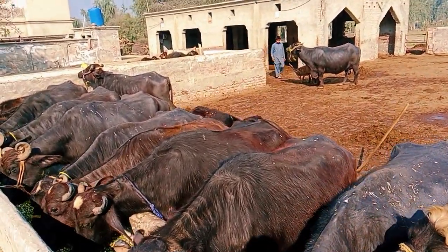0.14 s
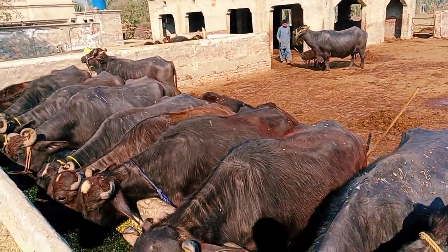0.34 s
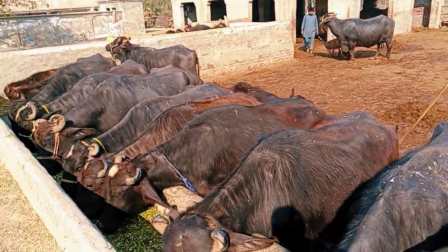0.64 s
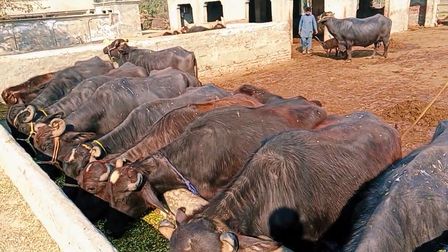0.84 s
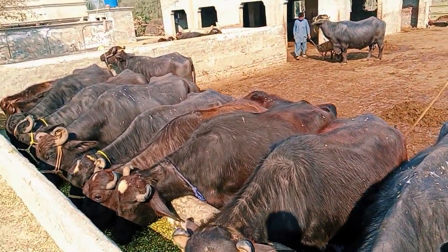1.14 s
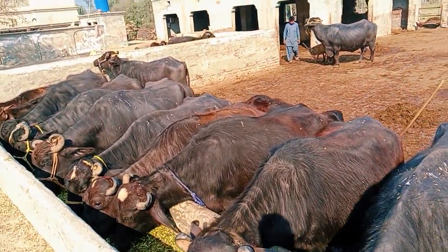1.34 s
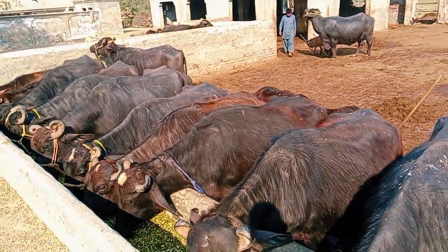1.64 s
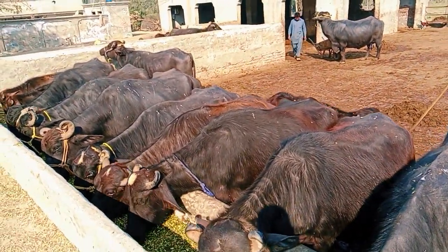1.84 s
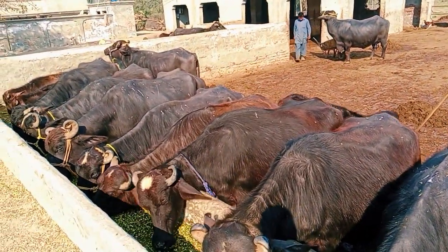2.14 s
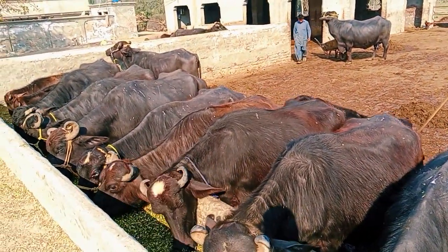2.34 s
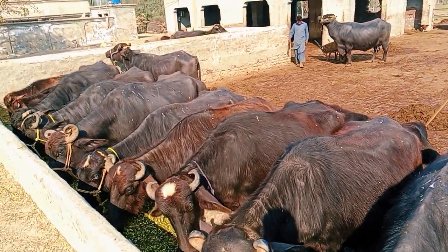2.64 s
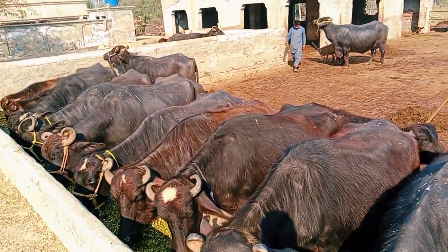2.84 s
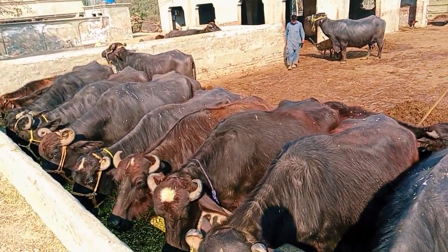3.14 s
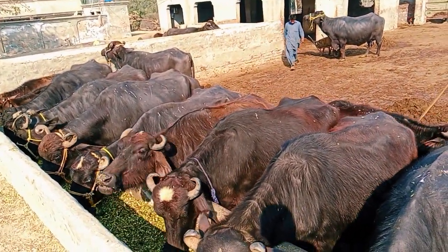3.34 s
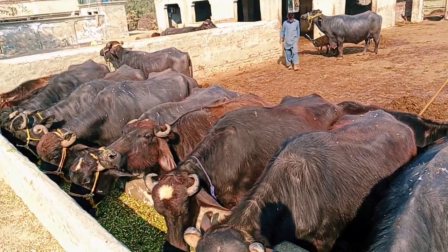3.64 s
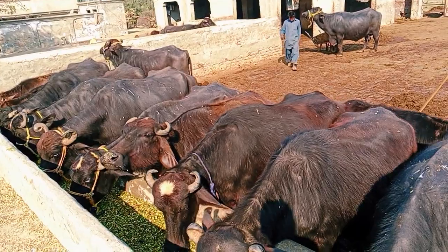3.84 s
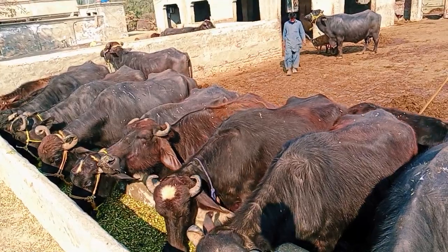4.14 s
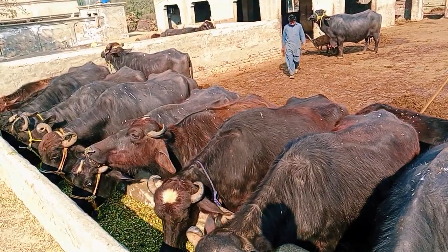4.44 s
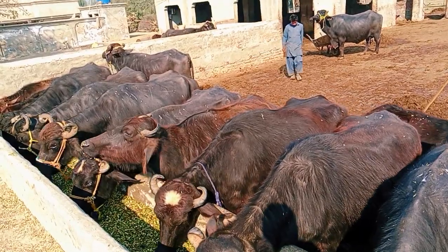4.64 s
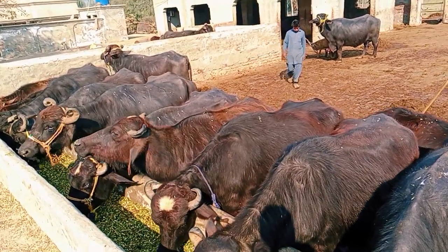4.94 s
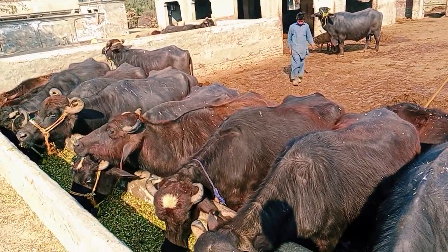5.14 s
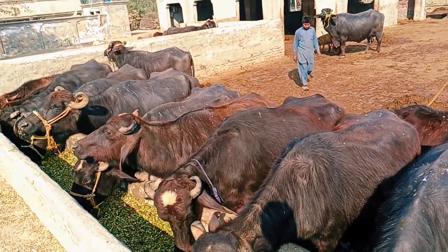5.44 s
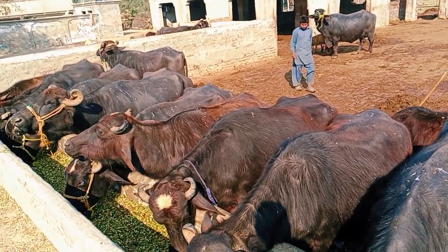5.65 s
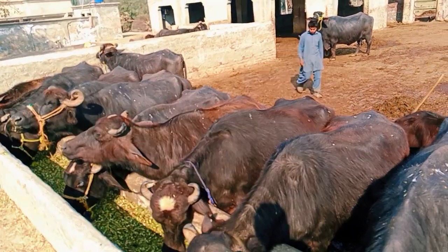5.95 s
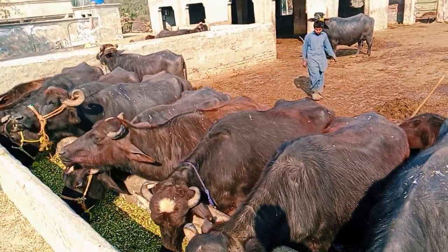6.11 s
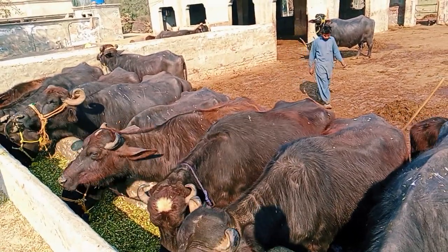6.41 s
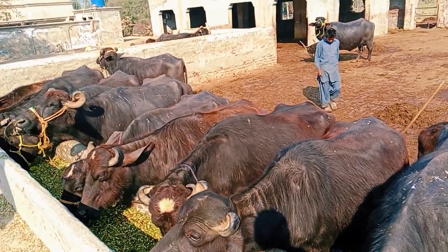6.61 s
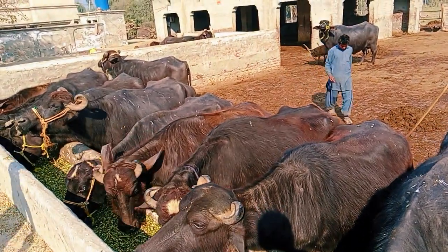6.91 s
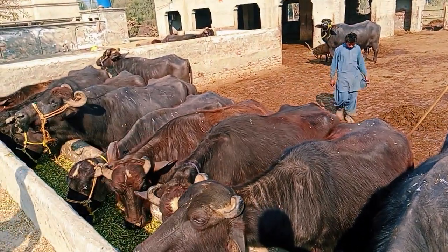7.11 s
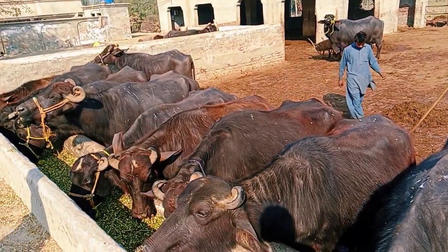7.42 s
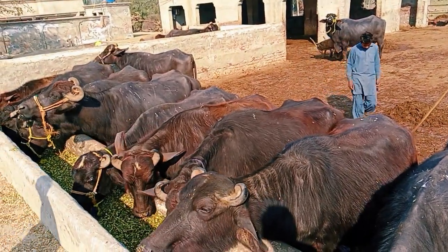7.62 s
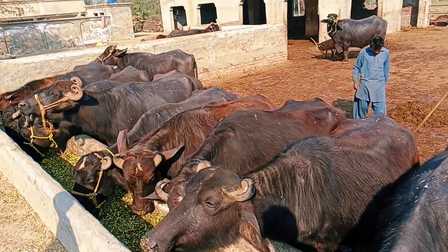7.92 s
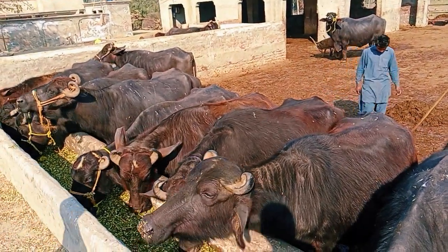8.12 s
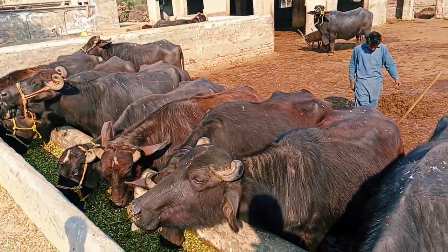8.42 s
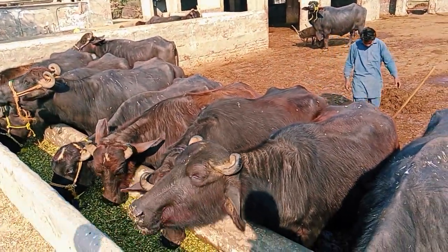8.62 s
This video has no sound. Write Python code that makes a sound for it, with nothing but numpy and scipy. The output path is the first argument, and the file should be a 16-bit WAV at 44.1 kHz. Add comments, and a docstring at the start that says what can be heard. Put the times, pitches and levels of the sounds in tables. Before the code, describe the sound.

From about 0.1 to 1.2 seconds a water buffalo lows close by, deep and nasal, rising slightly, opening wide, then dropping into a rough creak. Light wind, faint herd shuffling and a distant bird flock lie underneath. Quick twitters arrive at 1.1, and hollow trough knocks stand out near 1.0, 1.7 and 2.2. From 2 to 4.5 mynas give gliding whistles, chips and raspy scolds, with lower single pips. Between 4.6 and 5.3 birds burst into a dense, loud, harsh flurry. Around 5.4 to 5.7 a puff of wind bumps the microphone with dull low thuds. Sparser arched whistles and knocks follow; at 7.1 come chirps and crackly chatter, then a faint low dove-like coo near 7.35. From 8.2 to 8.6 stalks snap sharply amid rustling, a shifting body and high chirps, with final bright whistles at 8.7. Yard walls echo briefly.

```python
"""Buffalo at the trough

In a walled yard a water buffalo lows once: vocal-fold pulses ring its opening and closing mouth, then creak.
Mynas whistle, chip and rasp in gliding tones, near and far; a lower bird pips, one coos low like a dove,
and bursts of tiny ringing grains make a harsh, crackly chatter.
The herd knocks, scuffs and rustles in the fodder as bursts and noise that ring trough and stalks.
A puff of wind swells as low noise and bumps the microphone; the walls answer with decaying echoes."""
import sys
import numpy as np
from scipy import signal
from scipy.fft import rfft, irfft, next_fast_len
from scipy.io import wavfile
from scipy.ndimage import uniform_filter1d, map_coordinates

SR = 44100
rng = np.random.default_rng(int(sys.argv[2]) if len(sys.argv) > 2 else 0)


def unload_audio(sound):
    """Save the sound as a 16-bit wav file, at the path given as the first command line argument."""
    columns = np.transpose(np.atleast_2d(sound))
    # keep every value between -1 and 1, then stretch to whole-number steps
    steps = np.round(np.clip(columns, -1, 1) * 32767)
    wavfile.write(sys.argv[1], SR, steps.astype(np.int16))


N = 386757

# echo decay of the near yard walls: pitch_hz, t60_s
WALL_DECAY = [(100, 0.57), (700, 0.12), (2500, 0.21), (6000, 0.23), (12000, 0.19)]
# relative noise spectra of wind, herd, far birds, fodder and still air: pitch_hz, level_db (per Hz)
WIND_SPECTRUM = [(20, -31), (45, -5.5), (75, 4.5), (130, -4), (220, -11), (500, -69)]
HERD_SPECTRUM = [(120, -22.5), (250, 4), (500, -4), (800, -2.5), (1200, -2), (2200, -6), (5000, -33)]
FLOCK_SPECTRUM = [(900, -20), (1400, -5.5), (2000, -2), (3000, 1), (4500, -3), (6400, -13), (7500, -23),
                  (9000, -45)]
FODDER_SPECTRUM = [(2350, -54.5), (4000, -37), (4940, -10.5), (5380, 6.5), (6870, 7.5), (8800, -13),
                   (10500, -7.5), (12300, -11.5), (15600, -12)]
AIR_SPECTRUM = [(180, -26), (300, 4), (452, -3), (775, 3), (975, -7), (3120, -6.5), (3440, -19.5),
                (5440, -15), (8320, -29.5), (15000, -37.5)]
# level of the far flock, before a common trim: time_s, level_db
FLOCK_LEVEL = [(0, -48.5), (1.15, -53.5), (1.35, -51), (1.65, -52), (1.82, -45.5), (2.24, -60),
               (3.09, -62.5), (3.25, -58.5), (3.88, -54), (4.03, -62.5), (4.62, -67.5), (4.79, -47.5),
               (5.32, -55.5), (5.48, -61), (6.4, -54.5), (6.75, -70), (6.94, -54), (7.06, -47.5),
               (7.14, -48.5), (7.48, -66.5), (8.05, -59), (8.5, -55.5), (8.77, -103)]
# animals shifting their weight: start_s, fade_s (to fall 17 dB), level_db
SHIFTS = [(1.56, 0.14, -66), (3.11, 0.028, -54), (5.51, 0.057, -54.5), (7.07, 0.072, -70),
          (8.39, 0.047, -41)]
# mouthfuls of fodder pulled: start_s, fade_s (to fall 17 dB), level_db
RUSTLES = [(2.94, 0.11, -51.5), (3.56, 0.17, -57), (3.9, 0.061, -64.5), (4.1, 0.25, -72),
           (4.7, 0.049, -61.5), (5.21, 0.011, -62), (8.385, 0.19, -50.5), (8.54, 0.24, -58),
           (8.73, 0.15, -52.5)]
STROKE_ATTACK_S = 0.022
# the puff of wind builds, then drops away
GUST_S, GUST_DB, GUST_BUILD_DB_PER_S, GUST_DROP_DB_PER_S = 5.64, -42.5, 46.5, 303

# harsh scolding notes, before the direct and echo shares: start_s, length_s, pitch_hz, level_db
SCOLDS = [(0.013, 0.24, 1290, -41), (.457, 0.041, 5320, -44), (0.598, 0.038, 6440, -44),
          (.73, .11, 5850, -45.5), (1.704, 0.18, 4680, -42.5), (2.168, 0.056, 5260, -52.5),
          (2.483, 0.072, 2610, -38.5), (3.018, 0.26, 1996, -38), (5.93, 0.09, 4100, -47.5),
          (5.93, 0.031, 1667, -46), (5.99, 0.076, 5900, -55.5), (7.087, 0.047, 1834, -48),
          (7.064, 0.089, 4320, -47.5), (7.076, 0.17, 2920, -49), (7.195, 0.049, 5700, -51),
          (7.99, 0.073, 5200, -56.5), (8.245, 0.069, 3420, -44)]
SCOLD_FALL, SCOLD_RASP_PER_HZ = 0.0306, 0.000275  # swing either side of the pitch; higher notes are harsher

# the low, ending in a creak of slack folds: time_s, pitch_hz
LOW_PITCH = [(.079, 78), (0.15, 82.0), (0.238, 88.0), (0.364, 93.9), (0.478, 95.3), (0.778, 91.2),
             (0.946, 85.5), (1.006, 80.7), (1.044, 76.8), (1.1, 67.9), (1.14, 55), (1.2, 42), (1.28, 40)]
# time_s, mouth_shape (0 opening, 1 wide, 2 closing), tongue_tuning (ratio, upper resonances),
# treble_tuning (ratio), treble_db
MOUTH = [(.15, .38, 1.05, 1.19, -7.5), (.27, .5, 0.97, 1.06, -7.5), (.42, .82, 0.99, 1.03, -6),
         (.55, .9, 1.02, 1.07, -1), (.7, 1.25, 0.97, 0.994, -1.5), (.82, 1.55, 1.034, 1.02, -1.5),
         (.97, 1.65, 1.02, 1.03, -9), (1.12, 1.8, .99, 1.065, 0)]
# throat resonances for each mouth shape: pitch_hz, half_width_hz, level_db
OPENING_THROAT = [(448, 66, 0), (686, 27, 5.5), (980, 150, 5), (1265, 28, 12), (1563, 31, 3.5),
                  (1900, 160, -1), (2280, 62, 7.5), (2570, 120, 3), (3090, 56, 4.5), (3550, 58, 3),
                  (4400, 240, -27)]
WIDE_THROAT = [(285, 100, -13.5), (667, 29, 3.5), (821, 72, 5.5), (940, 42, -1), (1275, 50, 1),
               (1490, 85, -9), (2070, 43, -8), (2375, 123, -9), (2816, 48, -11), (3200, 96, -9.5),
               (3700, 87, -12.5), (4036, 37, -11), (4250, 550, -29.5)]
CLOSING_THROAT = [(467, 51, -3), (699, 44, 0.5), (972, 32, 3), (1305, 64, -4.5), (1590, 67, -6),
                  (1837, 42, -11.5), (2160, 95, -5.5), (2424, 47, -8), (2950, 180, -30), (3330, 59, -9.5),
                  (4200, 130, -43)]
# treble resonances shared by all mouth shapes: pitch_hz, half_width_hz, level_db
TREBLE_THROAT = [(5080, 230, -26), (5610, 180, -19), (6320, 124, -23.5), (7310, 140, -33),
                 (10200, 580, -56)]
STEADY_HZ, CREAK_HZ = 84.3, 54.8  # the folds slacken between these pitches
# effort of the low: it swells, sags slowly, then lets go
ATTACK_S, ATTACK_DB = 0.029, 40
CREST_S, CREST_DB, SAG_DB_PER_S = 0.49, -29.5, 6.5
RELEASE_S, RELEASE_DB_PER_S = 1.145, 170
# the nose hums unless the mouth is wide, grows as the breath runs on, and dies more slowly
HUM_DB, HUM_GROWS_DB_PER_S = -40.5, 9
HUM_RELEASE_S, HUM_RELEASE_DB_PER_S = 1.04, 78
HUM_CUT_DB, HUM_CUT_WIDTH = 11.5, 0.39  # loss with the mouth wide; range of mouth shapes that counts as wide

# rising chirps: start_s, pitch_hz, level_db
CHIRPS = [(.26, 4520, -41), (2.016, 2670, -49.5), (3.5, 1967, -46.5), (7.062, 1624, -37.5),
          (8.304, 4050, -46), (8.38, 5630, -42), (8.425, 3960, -46.5), (8.439, 4920, -45.5)]
CHIRP_S, CHIRP_RISE, CHIRP_RASP = 0.047, 0.12, 0.24  # length, swing either side of the pitch, rasp
# slurs and held whistles, one a low dove-like coo; most fall and level out, some stay level or rise:
# start_s, length_s, start_hz, end_hz, level_db, rasp (0-1)
SLURS = [(0.93, 0.056, 3420, 2270, -35.5, 0.1), (1.641, 0.09, 2830, 2782, -40.5, 0.08),
         (2.074, 0.029, 3310, 3390, -49.5, 0.17), (2.095, 0.072, 3155, 2530, -41, 0.1),
         (2.257, 0.064, 4640, 4560, -54.5, 0.2), (2.37, 0.031, 3460, 3390, -35.5, 0.1),
         (2.395, 0.023, 3100, 2690, -38, 0.25), (2.416, 0.1, 2860, 2056, -44.5, .14),
         (2.668, 0.12, 2150, 1966, -49.5, 0.05), (2.679, 0.13, 4210, 3880, -50.5, 0),
         (3.311, 0.03, 3250, 3306, -40, 0), (3.337, 0.094, 2995, 2720, -44, 0.24),
         (3.538, 0.026, 3270, 3220, -39.5, 0.14), (3.372, 0.097, 2325, 2220, -48.5, 0.16),
         (3.812, 0.071, 2690, 1754, -40.5, 0.07), (4.281, 0.09, 2200, 2050, -43.5, 0.1),
         (4.37, 0.12, 2095, 2100, -53, 0.03), (4.223, 0.047, 3280, 3216, -48.5, 0.1),
         (4.594, 0.028, 2900, 2660, -51.5, 0.15), (4.619, 0.023, 3030, 2640, -41.5, 0.2),
         (4.651, .028, 2920, 2560, -41.5, 0.34), (4.685, 0.04, 3300, 2530, -32, 0.11),
         (4.72, 0.072, 2480, 2560, -43.5, 0.19), (4.776, 0.096, 2550, 1814, -46, 0.48),
         (5.137, 0.015, 4300, 3310, -34, 0.5), (5.145, 0.06, 3190, 2733, -31, 0.57),
         (5.212, 0.021, 1910, 1910, -44.5, 0.15), (5.229, 0.033, 3490, 2706, -31, 0.54),
         (5.263, 0.023, 2943, 2705, -26, 0.23), (5.302, 0.026, 2956, 2410, -30, 0.8),
         (5.315, 0.08, 2406, 1777, -36, 0.32), (5.754, 0.073, 2550, 2166, -53, 0.3),
         (6.295, 0.077, 2264, 2066, -48, 0.23), (6.702, 0.047, 2330, 2176, -54.5, 0.3),
         (7.303, 0.12, 4520, 4440, -57, 0.18), (7.328, 0.095, 1340, 1210, -56, 0.08),
         (7.938, 0.21, 2054, 1990, -57, 0.17), (7.343, 0.16, 635, 609, -57.5, 0.08),
         (7.493, 0.058, 4540, 4500, -55, 0), (7.783, 0.098, 5360, 5470, -57.5, 0),
         (7.634, 0.14, 5130, 5080, -54.5, 0.23), (8.688, 0.1, 4400, 4290, -42.5, 0.1),
         (8.689, 0.072, 5740, 5620, -47, 0.1), (8.686, 0.063, 2860, 2856, -46, .15),
         (8.72, 0.069, 2964, 3520, -37, 0.44)]
SLUR_LEFT = .28  # share of the glide still to go at mid-note
# hooked twitters that shoot up and drop again: start_s, length_s, top_hz, level_db
HOOKS = [(1.096, 0.031, 5380, -35), (1.133, 0.039, 4540, -35), (1.159, 0.043, 4670, -39.5),
         (3.561, 0.035, 2860, -36.5), (3.99, 0.029, 4430, -44), (4.83, 0.021, 7000, -45),
         (4.874, 0.022, 4980, -41), (5.086, 0.026, 5590, -46), (5.095, 0.028, 7250, -54),
         (5.572, .035, 3600, -48), (6.347, 0.021, 2810, -41.5), (6.408, 0.023, 2813, -41.5),
         (6.411, 0.029, 4440, -43), (6.938, 0.049, 3050, -41.5)]
HOOK_DROP, HOOK_RASP = 0.277, 0.42  # how far both ends lie under the top, rasp
# sharp falling chips: start_s, pitch_hz, level_db
CHIPS = [(1.912, 4820, -39.5), (2.376, 4390, -42.5), (3.433, 4510, -38), (4.293, 3980, -45.5),
         (4.651, 5400, -41), (4.668, 4060, -41), (4.88, 4726, -32.5), (5.123, 4940, -43),
         (6.873, 4400, -47.5), (7.263, 4570, -39.5), (8.043, 4520, -42.5)]
CHIP_S, CHIP_FALL, CHIP_RASP = 0.031, 0.138, 0.33  # length, swing either side of the pitch, rasp
# the lower bird's pips, all on one note: start_s, level_db
PIPS = [(2.597, -43), (3.938, -42.5), (4.51, -56), (6.022, -43), (7.26, -41), (7.692, -47), (8.758, -39)]
PIP_HZ, PIP_S = 1440, 0.021
# arched whistles: start_s, length_s, start_hz, end_hz, level_db
ARCHES = [(2.792, 0.11, 3980, 2720, -48.5), (2.789, 0.095, 1993, 1534, -51.5),
          (3.21, 0.14, 3598, 2847, -43), (3.243, 0.1, 1915, 1500, -48), (3.747, 0.081, 3630, 3040, -38.5),
          (5.661, 0.115, 2980, 2410, -43), (5.828, .14, 2486, 2340, -43.5), (5.829, 0.1, 1595, 1693, -54),
          (6.19, 0.12, 2856, 2264, -37.5), (6.603, .1, 3137, 2164, -39.5)]
ARCH_PER_S2 = 42  # how sharply every such whistle bends over

# hollow knocks at the trough: start_s, peak_db, pitch_hz, scuff_s (t60 of the blow, 0.005 at least)
KNOCKS = [(0.987, -25, 403, 0.012), (1.553, -38, 800, 0.16), (1.729, -27, 1183, 0.081),
          (2.169, -22.5, 1106, 0.036), (2.649, -40, 270, 0.031), (2.795, -31, 422, 0.046),
          (2.93, -52.5, 784, 0.13), (3.463, -46.5, 880, .04), (4.144, -45, 845, 0.078),
          (4.221, -42, 970, 0.13), (4.273, -40, 319, 0.099), (4.81, -42.5, 854, 0.23),
          (5.005, -33, 453, 0.06), (6.214, -36.5, 780, 0.089), (6.913, -34, 810, 0.084),
          (7.117, -43, 890, 0.2), (7.64, -41.5, 820, 0.15), (8.367, -36.5, 944, 0.11)]
# stalks snapping, before a common lift: start_s, peak_db
SNAPS = [(1.353, -42), (7.035, -45), (7.04, -41.5), (7.865, -47.5), (7.873, -51), (8.224, -43),
         (8.284, -38.5), (8.299, -28.5), (8.303, -27), (8.375, -37), (8.41, -34.5), (8.414, -27),
         (8.427, -28.5), (8.541, -53), (8.548, -48.5), (8.556, -45), (8.561, -62), (8.62, -50)]
# colour of a snapping stalk: pitch_hz, level_db
STALK_COLOUR = [(180, -6), (300, -0.5), (985, -1.5), (2170, -17.5), (2440, -10), (3400, -3.5), (4490, -1),
                (6050, -4), (15500, -26.5)]
# harsh crackly chatter, birds perhaps: start_s, length_s, rms_db
CRACKLES = [(1.725, 0.098, -49), (7.07, 0.083, -50.5), (7.755, .13, -54.5), (8.4, .06, -49)]
# colour of the crackly chatter: pitch_hz, level_db
CRACKLE_COLOUR = [(300, -11), (900, -6), (3500, 1), (6000, -9), (8000, -23.5), (15000, -34)]
# dull scuffs along the trough: start_s, length_s, level_db
SCUFFS = [(2.783, 0.014, -62), (4.246, 0.094, -53), (4.932, 0.18, -49.5), (5.231, 0.071, -58)]
# resonances of the trough: pitch_hz, half_width_hz, level_db
TROUGH_MODES = [(410, 66, -2), (698, 66, -4.5), (897, 29, -2.5)]
# wind bumps at the microphone: centre_s, level_db, pitch_hz
BUMPS = [(5.441, -37.5, 67.4), (5.482, -31.5, 86), (5.616, -32, 84.5), (5.644, -31.5, 88.7)]
TOP_HZ = 15740  # band limit of the recorder


def amp(db):
    """Decibels to gain."""
    return 10 ** (np.asarray(db) / 20)


def unit(x):
    """x at rms 1."""
    return x / np.sqrt(np.mean(x ** 2) + 1e-20)


def along(points, hz):
    """(Hz, value) points read on a log axis."""
    f, v = np.transpose(points)
    return np.interp(np.log(hz + 1), np.log(f + 1), v)


def curves(rows):
    """One value per sample for each column after the time."""
    s, *cols = np.transpose(rows)
    return [np.interp(np.arange(N) / SR, s, c) for c in cols]


def wobble(rate, size=N):
    """A smooth random curve, rate knots a second."""
    knots = rng.standard_normal(int(size * rate / SR) + 4)
    return map_coordinates(knots, [np.arange(size) * rate / SR])


def add(track, s, sound):
    """Mix a sound into a track at time s."""
    room = track[max(round(s * SR), 0):][:len(sound)]
    room += sound[:len(room)]


def coloured(x, gain, size=4096):
    """x through the minimum-phase filter whose gain is a function of frequency."""
    cepstrum = irfft(np.log(np.maximum(gain(np.fft.rfftfreq(size, 1 / SR)), 1e-6)))
    # folding the cepstrum forward makes the filter causal
    cepstrum[1:size // 2] *= 2
    cepstrum[size // 2 + 1:] = 0
    impulse = irfft(np.exp(rfft(cepstrum)))
    return signal.fftconvolve(x, impulse)[:len(x)]


def rush(spectrum):
    """Noise of rms 1 with a given spectrum."""
    return unit(coloured(rng.standard_normal(N), lambda hz: amp(along(spectrum, hz))))


def resonances(modes):
    """Gain of a set of steep-sided resonances."""
    return lambda hz: np.sqrt(sum((amp(db) / (1 + ((hz - f) / w) ** 2)) ** 2 for f, w, db in modes))


def echoes(x, delay=.012, lasting=1):
    """Answer of the yard walls: noise decaying at each pitch's own rate; far walls ring some times longer."""
    hz, t, z = signal.stft(rng.standard_normal(SR * 3 // 4), SR, nperseg=256)
    decay = 1e-3 ** (t / (lasting * along(WALL_DECAY, hz)[:, None]))
    tail = signal.istft(z * decay, SR, nperseg=256)[1]
    tail = tail / np.linalg.norm(tail)
    return signal.fftconvolve(x, np.pad(tail, (int(delay * SR), 0)))[:N]


def whistle(length, pitches, rasp, rasp_hz=260, rasp_rate=900, trill_hz=96, trill_swing_hz=320, waver=0.0036):
    """One gliding bird note; in harsh notes the syrinx rattles, shaking both pitch and loudness."""
    size = int(max(length, .01) * SR)
    u = np.linspace(0, 1, size)
    glide = np.polyval(np.polyfit([0, .5, 1], pitches, 2), u) * (1 + waver * wobble(150, size))
    rattle = 2 * np.pi * np.cumsum(trill_hz * (1 + .12 * wobble(60, size))) / SR
    hz = glide + rasp * (trill_swing_hz * np.cos(rattle) + rasp_hz * wobble(rasp_rate, size))
    phase = 2 * np.pi * np.cumsum(hz) / SR
    beats = np.exp(np.interp(rasp, [.3, .6], [.1, 1.1]) * np.sin(rattle))
    # short notes are more pointed
    arch = np.abs(np.sin(np.pi * u)) ** np.interp(length, [.03, .1], [.65, .4])
    swell = arch * unit(beats * amp(2.35 * wobble(70, size)))
    return swell * (np.sin(phase) + amp(-33) * np.sin(2 * phase))


def yard(herd_db=-69, fodder_db=-95, crackle_db=3.0, flock_trim_db=-2, air_db=-70):
    """Light wind, the shuffling herd, a far flock and crackly fodder over still air."""
    grain = amp(3.5 * wobble(350))
    shuffle = amp(herd_db + 4.8 * wobble(14)) + strokes(SHIFTS)
    herd = shuffle * unit(rush(HERD_SPECTRUM) * grain)
    flock = amp(curves(FLOCK_LEVEL)[0] + flock_trim_db) * far_flock()
    pulls = amp(fodder_db + 12.0 * wobble(4.5)) + strokes(RUSTLES)
    fodder = pulls * unit(rush(FODDER_SPECTRUM) * amp(crackle_db * wobble(440)))
    return wind() + herd + flock + fodder + amp(air_db) * rush(AIR_SPECTRUM)


def wind(start_db=-59.0, eases_db_per_s=0.58):
    """Low turbulent noise that wavers and slowly eases, with one puff that builds and drops."""
    time = np.arange(N) / SR
    after = time - GUST_S
    gust = amp(GUST_DB + np.minimum(GUST_BUILD_DB_PER_S * after, -GUST_DROP_DB_PER_S * after))
    breeze = amp(start_db - eases_db_per_s * time + 2.3 * wobble(6))
    return (breeze + gust) * unit(rush(WIND_SPECTRUM) * amp(6.3 * wobble(7.4)))


def strokes(rows, fade_db=17):
    """Envelope of the herd's movements: a quick rise, then a fade."""
    level, t = np.zeros(N), np.arange(SR // 2) / SR
    for s, length, db in rows:
        fade = amp(db - fade_db * np.maximum(t - STROKE_ATTACK_S, 0) / length)
        add(level, s, np.minimum(t / STROKE_ATTACK_S, 1) * fade)
    return level


def far_flock(count=520, direct_db=-9, wash_db=-13):
    """Many distant birds, evened in level: quick rough chirps, mostly echoes that merge into a wash."""
    song = np.zeros(N)
    for when, height, span, bend, harsh in rng.random((count, 5)):
        hz = 1300 + 5400 * height
        glide = hz * (1 + (bend - .6) * np.array([-.22, .04, .18]))
        add(song, when * N / SR - .05, whistle(.02 + .06 * span, glide, .5 * harsh ** 2))
    blurred = unit(echoes(song) + amp(direct_db) * song) + amp(wash_db) * rng.standard_normal(N)
    heard = coloured(blurred, lambda hz: amp(along(FLOCK_SPECTRUM, hz)) / (1 + (900 / (hz + 1)) ** 6))
    power = np.abs(uniform_filter1d(heard ** 2, SR // 6))
    return heard / np.sqrt(power + 0.012 * power.mean())


def scolds(direct_db=-4, echo_db=-3):
    """Harsh notes from further off, blurred by the walls."""
    song = np.zeros(N)
    for s, length, hz, db in SCOLDS:
        glide = hz * (1 + SCOLD_FALL * np.array([1, 0, -1]))
        add(song, s, amp(db) * whistle(length, glide, SCOLD_RASP_PER_HZ * hz))
    blurred = amp(direct_db) * song + amp(echo_db) * echoes(song, delay=0.0043)
    return coloured(blurred, lambda hz: 1 / (1 + (hz / 7200) ** 12))


def buffalo(nose_hz=250, patchy_db=4.5, chest_hz=150, chest_db=-7, slack_db=-6, lips_hz=400):
    """Folds slap shut, each pulse ringing throat and nose; slack ones close unevenly, hiss and thud."""
    time, t = np.arange(N) / SR, np.arange(4096) / SR
    pitch_curve = curves(LOW_PITCH)
    cycles = np.cumsum(pitch_curve[0] * (time > LOW_PITCH[0][0])) / SR
    last_cycle = cycles[int(LOW_PITCH[-1][0] * SR)]
    closures = np.interp(np.arange(1, last_cycle + .5), cycles, time)
    controls = np.array(pitch_curve + curves(MOUTH) + effort() + [amp(patchy_db * wobble(15.5))])
    voice, flesh = np.zeros(N), rng.standard_normal((16, 80))
    for s in closures:
        pitch, shape, tongue, treble, treble_db, loud_db, hum_db, turbulence = controls[:, round(s * SR)]
        slack = np.clip((STEADY_HZ - pitch) / (STEADY_HZ - CREAK_HZ), 0, 1)
        closing = np.clip(shape - 1, 0, 1)
        s = s + rng.normal(0, 1.5e-5 + 6e-5 * closing + .0018 * slack ** 2)
        # a narrow pulse placed between samples
        offset = (t - s) * SR + round(s * SR) - 8
        slap = np.sinc(offset) * np.exp(-(offset / 5) ** 2)
        air = .09 * turbulence * rng.standard_normal(len(t)) * np.exp(-t / (.005 + .006 * slack))
        hiss = coloured(air, lambda hz: .1 + .25 * closing + .7 * slack + 1 / (1 + (3900 / (hz + 1)) ** 3))
        colour = throat(shape, tongue, treble, treble_db)
        lips = lambda hz: 1 / (1 + (lips_hz / (hz + 1)) ** 3)
        mouth = coloured(slap + hiss, lambda hz: colour(hz) * drift(flesh, s, hz) * lips(hz))
        nose_mode = (nose_hz * (1 - .12 * slack), 24 + 35 * slack, 0)
        chest_mode = (chest_hz, 45, chest_db - 30 * (1 - slack))
        nose = coloured(slap, resonances([nose_mode, chest_mode]))
        duty = np.sqrt(1 / (pitch * t[-1]))  # one pulse carries one cycle's energy
        pulse = amp(loud_db + slack_db * slack) * unit(mouth) + amp(hum_db) * unit(nose)
        add(voice, s, duty * amp(rng.normal(0, .7 + 1.2 * slack)) * pulse)
    return voice


def throat(shape, tongue, treble, treble_db):
    """Gain between three mouth shapes; the tongue slides upper resonances, treble ones glide alone."""
    shares = np.clip(1 - np.abs(np.clip(shape, 0, 2) - np.arange(3)), 0, 1)
    shapes = [OPENING_THROAT, WIDE_THROAT, CLOSING_THROAT]

    def gain(hz):
        slid = hz / np.interp(hz, [1000, 2000], [1, tongue])
        body = sum(share * resonances(modes)(slid) for share, modes in zip(shares, shapes))
        return body + amp(treble_db) * resonances(TREBLE_THROAT)(hz / treble)
    return gain


def drift(field, s, hz):
    """The soft throat never holds still: it swells and fades in slow patches, high resonances most."""
    depth_db = np.interp(hz, [600, 2000, 5000], [1, 2.2, 3.5])
    return amp(depth_db * map_coordinates(field, [np.full_like(hz, 9 * s), hz / 320]))


def effort():
    """Levels in dB from the mouth and from the nose through the low."""
    time = np.arange(N) / SR
    swell = -ATTACK_DB * np.exp(-np.maximum(time - LOW_PITCH[0][0], 0) / ATTACK_S)
    mouth_late = np.maximum(time - RELEASE_S, 0)
    nose_late = np.maximum(time - HUM_RELEASE_S, 0)
    wide = np.exp(-np.abs((curves(MOUTH)[0] - 1) / HUM_CUT_WIDTH) ** 4)
    mouth = CREST_DB - SAG_DB_PER_S * np.abs(time - CREST_S) - RELEASE_DB_PER_S * mouth_late
    nose = HUM_DB + HUM_GROWS_DB_PER_S * (time - CREST_S) - HUM_CUT_DB * wide
    nose = nose - HUM_RELEASE_DB_PER_S * nose_late
    return [mouth + swell, nose + swell]


def near_birds(dull_hz=7000):
    """Mynas, the lower bird's pips and one low dove-like coo; distance takes the top off their notes."""
    song = np.zeros(N)
    for s, length, pitches, db, rasp in notes():
        add(song, s, amp(db) * whistle(length, pitches, rasp))
    return coloured(song, lambda hz: 1 / (1 + (hz / dull_hz) ** 12))


def notes():
    """Bird notes as start_s, length_s, (start, middle, end) Hz, level_db, rasp, by the rule of their kind."""
    tilt = np.array([1, 0, -1])
    found = [(s, CHIRP_S, hz * (1 - CHIRP_RISE * tilt), db, CHIRP_RASP) for s, hz, db in CHIRPS]
    for s, span, a, b, db, rasp in SLURS:
        found.append((s, span, [a, b + SLUR_LEFT * (a - b), b], db, rasp))
    for s, span, hz, db in HOOKS:
        found.append((s, span, hz * (1 - HOOK_DROP * np.abs(tilt)), db, HOOK_RASP))
    for s, hz, db in CHIPS:
        found.append((s, CHIP_S, hz * (1 + CHIP_FALL * tilt), db, CHIP_RASP))
    for s, db in PIPS:
        found.append((s, PIP_S, [PIP_HZ, PIP_HZ, PIP_HZ], db, .05))
    for s, span, a, b, db in ARCHES:
        middle = (a + b) / 2 * (1 + ARCH_PER_S2 * (span / 2) ** 2)
        found.append((s, span, [a, middle, b], db, .05))
    return found


def knocks(width=0.15):
    """Muzzles and hooves: a blow and a brief scuff ring a broad, dull resonance and a weaker one above."""
    track, t = np.zeros(N), np.arange(SR // 5) / SR
    for s, db, hz, scuff_s in KNOCKS:
        blow = .1 * rng.standard_normal(len(t)) * 1e-3 ** (t / max(scuff_s, .005))
        blow[0] += 1
        knock = coloured(blow, resonances([(hz, width * hz, 0), (1.52 * hz, width * hz, -9)]))
        add(track, s, amp(db) * knock / abs(knock).max())
    return track


def snaps(decay_s=0.0012, lift_db=2):
    """Dry stalks break with a very short crack."""
    track, t = np.zeros(N), np.arange(SR // 20) / SR
    for s, db in SNAPS:
        burst = rng.standard_normal(len(t)) * np.exp(-t / decay_s)
        crack = coloured(burst, lambda hz: amp(along(STALK_COLOUR, hz)))
        add(track, s, amp(db + lift_db) * crack / abs(crack).max())
    return track


def crackly_chatter(count=55, ring_s=0.0052, spread_db=14):
    """Harsh crackly chatter, birds perhaps: a swell of tiny ringing grains, each at its own pitch."""
    track, t = np.zeros(N), np.arange(SR // 30) / SR
    for s, length, db in CRACKLES:
        burst = np.zeros(int(length * SR) + len(t))
        for when, height, size in rng.random((count, 3)):
            hz = 500 + 6500 * height
            ringing = np.sin(2 * np.pi * hz * t) * np.exp(-t / ring_s)
            click = rng.standard_normal(len(t)) * np.exp(-t / .001)
            level = np.sin(np.pi * when) ** .5 * amp(-spread_db * size)
            add(burst, when * length, level * (ringing + click))
        add(track, s, amp(db) * unit(coloured(burst, lambda hz: amp(along(CRACKLE_COLOUR, hz)))))
    return track


def scuffs():
    """Bodies rub the trough and set it sounding."""
    rub = unit(coloured(rng.standard_normal(N), resonances(TROUGH_MODES)))
    stroke = np.zeros(N)
    for s, length, db in SCUFFS:
        add(stroke, s, amp(db) * np.hanning(int(length * SR)) ** .5)
    return rub * stroke


def bumps(length_s=0.0096):
    """Eddies push on the microphone for a cycle or two."""
    track, t = np.zeros(N), np.arange(-SR // 20, SR // 20) / SR
    for s, db, hz in BUMPS:
        add(track, s + t[0], amp(db) * np.sin(2 * np.pi * hz * t) * np.exp(-(t / length_s) ** 2))
    return track


def scene(low_echo_db=-11, bird_echo_db=-7, clatter_echo_db=-6, snap_echo_db=-12, far_wall_db=-17):
    """All sources at the microphone, with wall echoes of voice, birds, trough, chatter and stalks."""
    low, birds, stalks = buffalo(), near_birds(), snaps()
    clatter = knocks() + scuffs() + crackly_chatter()
    walls = amp(low_echo_db) * echoes(low) + amp(bird_echo_db) * echoes(birds)
    walls = walls + echoes(amp(clatter_echo_db) * clatter + amp(snap_echo_db) * stalks)
    far_walls = amp(far_wall_db) * echoes(birds, delay=0.055, lasting=3.1)
    return (yard() + scolds() + low + birds + clatter + stalks + bumps() + walls + far_walls)[None]


def record(dry):
    """The recorder keeps nothing above its band limit."""
    size = next_fast_len(N + SR // 2)
    return irfft(rfft(dry, size) * (np.fft.rfftfreq(size, 1 / SR) < TOP_HZ), size)[:, :N]


dry = scene()
out = record(dry)
unload_audio(out)
```